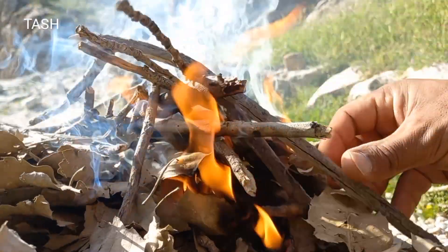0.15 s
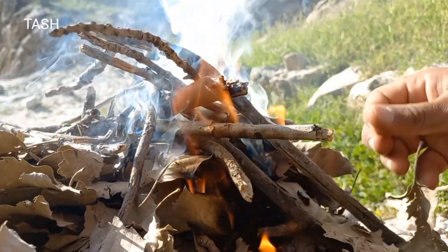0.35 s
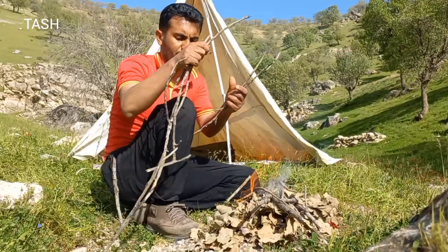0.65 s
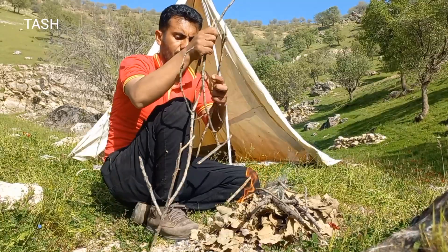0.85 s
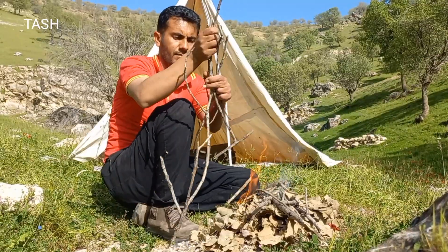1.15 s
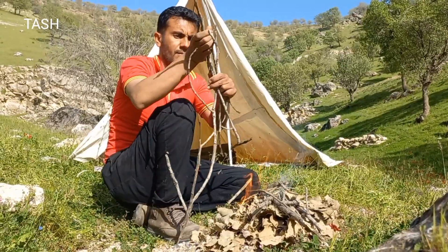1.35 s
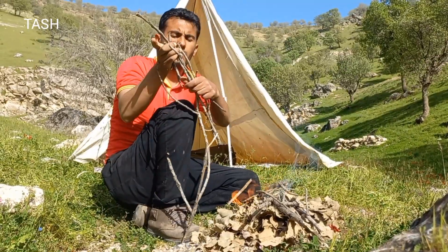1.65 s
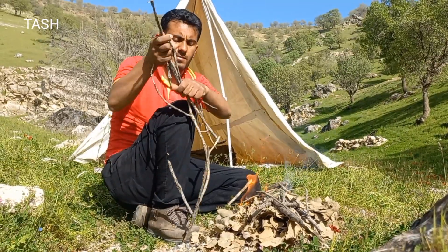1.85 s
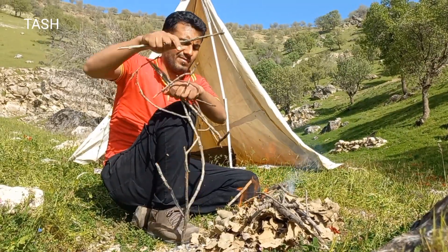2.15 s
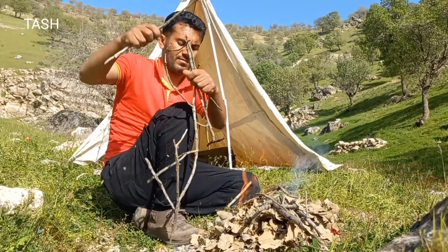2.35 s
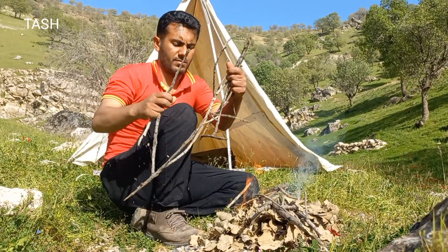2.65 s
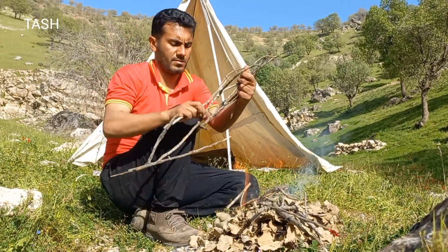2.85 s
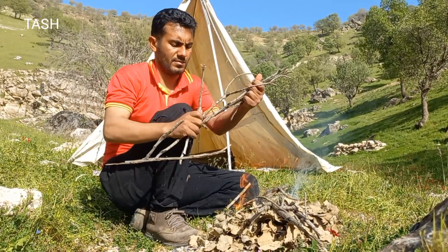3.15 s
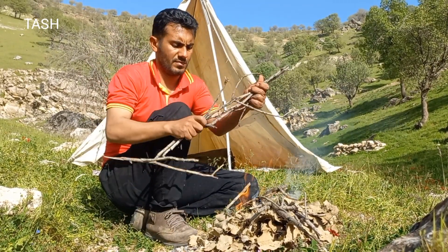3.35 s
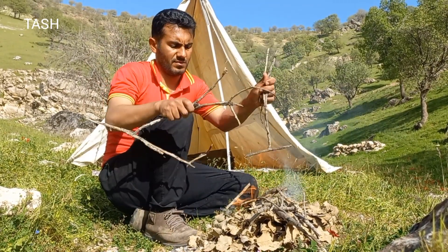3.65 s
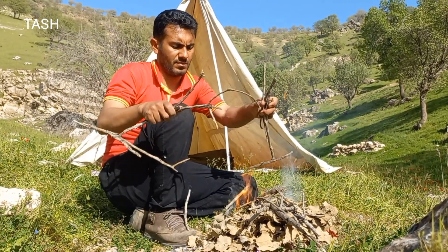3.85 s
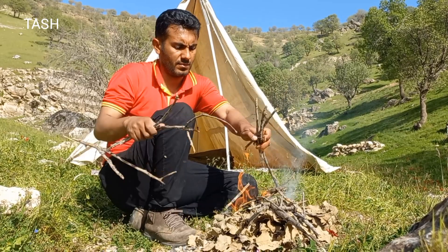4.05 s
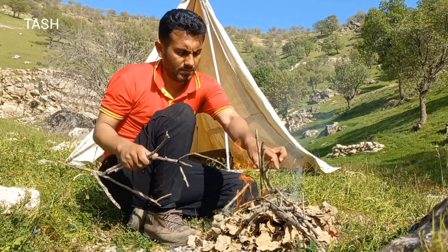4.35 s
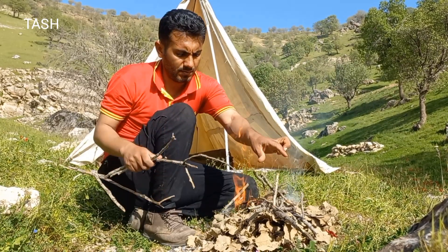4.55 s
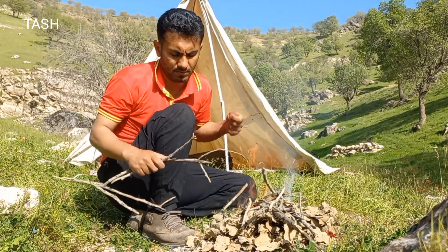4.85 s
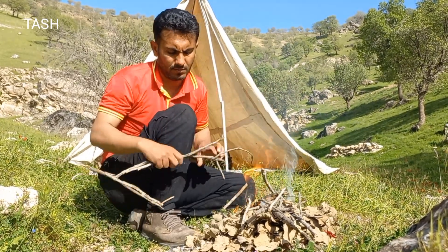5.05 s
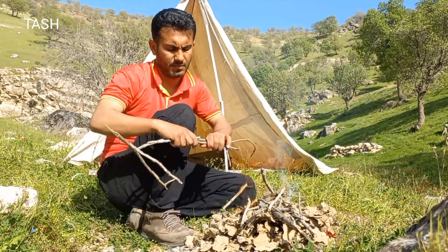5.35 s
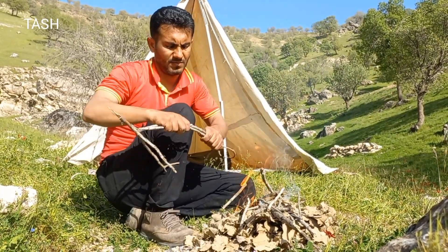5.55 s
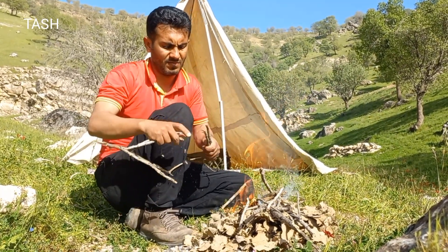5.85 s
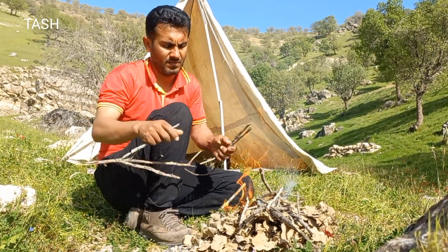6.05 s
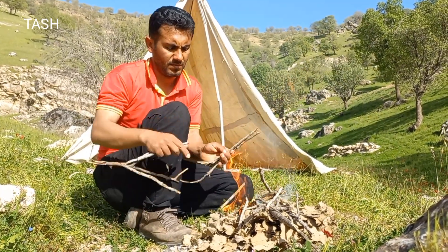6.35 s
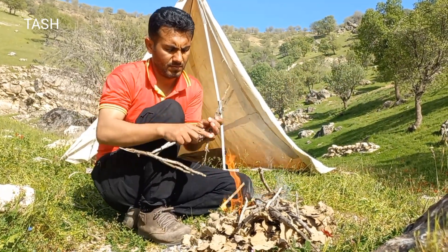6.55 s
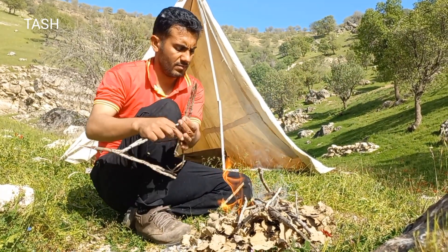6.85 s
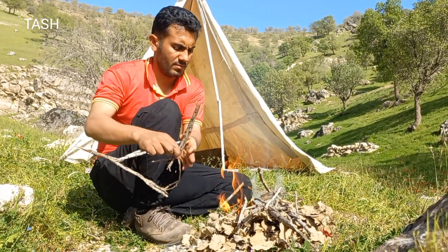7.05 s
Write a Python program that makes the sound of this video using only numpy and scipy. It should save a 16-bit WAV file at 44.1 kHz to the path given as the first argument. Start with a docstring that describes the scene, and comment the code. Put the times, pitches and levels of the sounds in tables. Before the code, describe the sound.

A stick is pushed into a small fire close by, with dry crackles, two tiny pops and a low flutter of flames. Then a thin branch is handled and broken, with sharp snaps near two and three seconds and fine rustling between. A soft dull knock follows, a distant bird whistles downward, one more snap comes, and the rubbing fades. Open hillside, close stereo microphone, soft hollow murmur behind.

```python
"""Dry twigs are snapped by hand beside a small fire on an open hillside.
First a stick is pushed into the fire close by, with two pops and a soft flutter of flames (shaped noise).
Then a branch is handled, bent and broken: short noise bursts ring in the wood, and tiny clicks make the rustle.
Midway a distant bird whistles (gliding sines), and once more near the end, while the rubbing grows quieter.
Throughout, the valley murmurs: soft noise with a faint hollow tone."""
import sys
import numpy as np
from scipy import signal
from scipy.io import wavfile

SR = 44100
rng = np.random.default_rng(int(sys.argv[2]) if len(sys.argv) > 2 else 0)


def dump_mix(stems):
    """Bounce the given channels to the path in sys.argv[1] as a 16-bit WAV at rate SR."""
    frames = np.atleast_2d(stems).T  # one column per channel
    limited = np.clip(frames, -1, 1)  # hard clip at full scale
    pcm = np.round(limited * 32767).astype(np.int16)
    wavfile.write(sys.argv[1], SR, pcm)


N = 317961
TIME = np.arange(N) / SR
LEAD_MS = 4   # each crack sound starts this long before the break itself
CRACK_MS = np.arange(SR // 12) * 1000 / SR - LEAD_MS   # clock of one crack, 0 at the break

# Body, crack and splinter ranges of dry wood. Each row: lowest and highest frequency in Hz.
WOOD_BANDS = [(1050, 2500), (2500, 7700), (8700, 16500)]


def from_db(db):
    """Decibels to gain."""
    return 10 ** (np.asarray(db) / 20)


def rms_one(x):
    """Scale to an rms (average strength) of 1."""
    return x / np.sqrt(np.mean(x ** 2) + 1e-20)


def in_time(rows):
    """Read each column of a curve at every sample; the first column is the time in seconds."""
    s, *columns = np.transpose(rows)
    return [np.interp(TIME, s, column) for column in columns]


def at_hz(points, hz):
    """Read a spectrum on a log-frequency axis."""
    point_hz, values = np.array(points)[:, 0], np.array(points)[:, 1]
    return np.interp(np.log(hz), np.log(point_hz), values)


def panned(pan_db):
    """Left and right gains that differ by pan_db (positive is left), scaled to an rms of 1."""
    return rms_one(from_db(np.array([[.5], [-.5]]) * pan_db))


def band(low, high, order=2):
    """Filter that passes low to high Hz."""
    return signal.butter(order, [low, min(high, .45 * SR)], "band", fs=SR, output="sos")


WOOD_FILTERS = [band(low, high, order=3) for low, high in WOOD_BANDS]


def highpass(x, hz):
    """Remove the sound below hz."""
    return signal.sosfilt(signal.butter(2, hz, "high", fs=SR, output="sos"), x)


def drift(rate_hz):
    """Slow random wandering around 0 with rms 1, made at a fortieth of the sample rate."""
    r = np.exp(-80 * np.pi * rate_hz / SR)
    noise = rng.standard_normal(N // 40 + 2002)
    slow = signal.lfilter([1], [1, -2 * r, r * r], noise)[2000:]   # drop the filter's start
    return np.interp(np.arange(N) / 40, np.arange(len(slow)), rms_one(slow))


def resonance(x, hz, width_hz):
    """Two-pole resonance with gain 1 on top."""
    return signal.lfilter(*signal.iirpeak(min(hz, .45 * SR), hz / width_hz, fs=SR), x)


def swell(start_s, length_s, attack_s, release_s):
    """Gain that rises, holds at 1 and dies away; attack and release are the times for 20 dB."""
    before = np.maximum(start_s - TIME, 0) / attack_s
    after = np.maximum(TIME - start_s - length_s, 0) / release_s
    return from_db(-20 * np.minimum(before + after, 5))


def add(out, s, sound):
    """Mix a sound in at time s."""
    i = max(0, round(s * SR))
    out[:, i:i + sound.shape[-1]] += sound[..., :N - i]


def fracture(levels_db, hold_ms, modes, spike_db, spike_ms, fall, lead_db):
    """Fibres start to tear, then give way in a spike; dense modes and the ground's scatter hold it a few ms."""
    after, broken = np.maximum(CRACK_MS, 0), CRACK_MS >= 0
    tearing = from_db(lead_db) * np.exp(np.minimum(CRACK_MS, 0) / 1.5)
    envelope = np.where(broken, 1 / (1 + (after / hold_ms) ** fall), tearing)
    out = 0
    for sos, db, sharp_db in zip(WOOD_FILTERS, levels_db, (-5, -4, 4)):   # the spike is sharpest in the treble
        spike = rng.standard_normal(len(after)) * broken * np.exp(-after / spike_ms)
        spike = spike * from_db(spike_db + sharp_db)
        burst = spike * panned(11) + rng.standard_normal((2, len(after))) * envelope
        ringing = sum(from_db(mode_db) * resonance(burst, hz, width_hz) for hz, width_hz, mode_db in modes)
        part = signal.sosfilt(sos, burst + ringing)
        # the level is that of the first 8 ms, on each side
        early_power = np.mean(part[:, broken & (after < 8)] ** 2, axis=1, keepdims=True)
        out = out + from_db(db) * part / np.sqrt(early_power)
    return out


def mode(hz, t60_s):
    """One struck mode of the wood; it reaches each microphone port within a cycle of the break."""
    t = np.maximum(CRACK_MS / 1000 - rng.random((2, 1)) / hz, 0)
    return np.sin(2 * np.pi * hz * t) * from_db(-60 * t / t60_s)


def snaps(piece_t60_s=0.035, thump_t60_s=0.05, ring_pan_db=-1.5, second_db=-7.5):
    """The branch breaks in stages; it and the freed piece ring, and the recoil in the hands adds a low thump."""
    # Each row: time in seconds, body, crack and splinter levels in dB, first and second pitch of the
    # broken piece in Hz, its ring in dB, ring of the branch in dB, thump in dB, hold time in ms,
    # left over right in dB.
    breaks = [(0.387, -66, -40.5, -46, 5600, 4550, -31.5, -75, -70, 9.2, -2),
              (1.726, -50, -42.5, -38.5, 3020, 3400, -36.5, -55, -56, 4.5, -3.5),
              (1.9469, -49.5, -41, -39.5, 2550, 2010, -32, -55.5, -47, 1.9, 2.5),
              (1.9498, -41, -34, -26, 2280, 7400, -36, -40.5, -59, 8.7, -2),
              (1.9849, -31, -24.5, -26.5, 2280, 1860, -30, -37, -69, 5.2, 0),
              (2.6873, -76, -41, -42, 3350, 5500, -53, -65, -52, 5.8, -4),
              (3.3247, -43, -34, -31.5, 1540, 2850, -33, -48, -41.5, 2.1, 0.5),
              (3.327, -39, -33, -20, 1567, 1940, -30.5, -39.5, -48, 5.8, -2),
              (3.372, -63, -35, -26, 6140, 4000, -32, -48, -51, 4.8, -2.5),
              (5.5164, -52, -45, -28.5, 12700, 1730, -29, -54, -47.5, 0.8, 7),
              (5.5172, -46, -37, -33.5, 1933, 1700, -37.5, -66, -52, 5, -4)]
    # Modes (ringing tones) of the dry branch. Each row: pitch in Hz, level in dB.
    branch = [(1040, -20), (1180, -12.5), (1640, 2), (1880, -7), (2270, -8), (2830, 0), (3070, -5),
              (3830, -10.5), (4230, 0), (4780, -5), (5130, -3.5), (6450, -9.5)]
    # Resonances of the splintering fibres. Each row: pitch in Hz, width in Hz, level in dB.
    fibres = [(6800, 850, -3.5), (7200, 150, 3), (11360, 350, 0.5), (12500, 310, -2.5)]
    branch_t60_s, mode_spread_db = 0.038, 2   # every break wakes each mode a little differently
    thump_low_hz, thump_high_hz = 260, 950
    out, after = np.zeros((2, N)), np.maximum(CRACK_MS, 0) / 1000
    mode_hz, mode_db = np.transpose(branch)
    for (s, body, crack, splinter, piece_hz, second_hz, piece_db, branch_db,
         thump_db, hold_ms, pan) in breaks:
        sound = fracture([body, crack, splinter], hold_ms, fibres,
                         spike_db=7, spike_ms=0.26, fall=2.6, lead_db=-15)
        spread_db = mode_spread_db * rng.standard_normal((2, len(mode_hz)))
        strengths = from_db(branch_db + mode_db + spread_db)
        ring = sum(gain[:, None] * mode(hz, branch_t60_s) for hz, gain in zip(mode_hz, strengths.T))
        piece = mode(piece_hz, piece_t60_s) + from_db(second_db) * mode(second_hz, piece_t60_s)
        ring = highpass(ring + from_db(piece_db) * piece, 600)   # the ring keeps no low end
        recoil = rng.standard_normal(len(after)) * (after > 0) * from_db(-60 * after / thump_t60_s)
        thump = signal.sosfilt(band(thump_low_hz, thump_high_hz, order=3), recoil)
        # make up for the strength lost in the narrow band
        thump = from_db(thump_db) * thump / np.sqrt(2 * (thump_high_hz - thump_low_hz) / SR)
        add(out, s - LEAD_MS / 1000, (sound + ring * panned(ring_pan_db) + thump) * panned(pan))
    return out


def ticks(rows, twig_db=-2.5, body_tilt=1.0, twig_width_hz=650):
    """Small fractures, each in a twig with its own pitch and hold time; bright ones trade body for splinter."""
    body_db, crack_db, splinter_db = -10.5, -0.5, 0.4   # the three ranges at brightness 0
    out = np.zeros((2, N))
    for s, db, bright_db, hz, pan in rows:
        hold_ms = 5 * from_db(rng.normal(0, 1.2))
        modes = [(hz, twig_width_hz, twig_db), (2.36 * hz, 700, twig_db)]
        levels_db = db + np.array([body_db - body_tilt * bright_db, crack_db, splinter_db + bright_db])
        sound = fracture(levels_db, hold_ms, modes, spike_db=2, spike_ms=.45, fall=2.3, lead_db=-12)
        add(out, s - LEAD_MS / 1000, sound * panned(pan))
    return out


def stray_ticks(rub_db):
    """Faint cracks at chance moments, their level tied to the rubbing up to a limit; rows as ticks() reads."""
    per_s, over_rub_db, spread_db, top_db = 7, 3, -1, -63.5   # top_db is the loudest allowed
    bright_mean_db, pan_db = -4, -7
    slots = np.arange(0, N, SR // 40)   # at most one crack in each slot
    chance, late, twig = rng.random((3, len(slots)))
    size, colour = rng.standard_normal((2, len(slots)))
    s = (slots + late * slots[1]) / SR
    db = np.minimum(rub_db[slots] + over_rub_db + spread_db * size, top_db)
    pan = np.full(len(slots), pan_db)
    rows = np.transpose([s, db, bright_mean_db + 3 * colour, 3500 + 4000 * twig, pan])
    return rows[(chance < per_s * slots[1] / SR) & (s < TIME[-1])]


def rubbing(resting_bright_db=-3):
    """Level and brightness of the rubbing: strokes add power to the handling, the strongest set the colour."""
    # The hands stay on the branch, busy at first and quieter once the piece is laid down.
    # Each row: time in seconds, level of the rubbing in dB.
    handling = [(0, -57), (.55, -83), (1.0, -67), (1.9, -70.5), (2.2, -71.5), (2.5, -69.5), (2.63, -76),
                (2.72, -73.5), (3.6, -64), (3.9, -78.5), (5.6, -81.5), (6.1, -87.5), (7.21, -85)]
    # Single scrapes of bark and leaves, and the creak before each break.
    # Each row: start in seconds, length in seconds, level in dB, brightness in dB.
    strokes = [(0.025, 0.012, -47, -2), (0.118, 0.07, -44.5, -5), (0.217, 0.042, -56.5, -3),
               (0.407, 0.034, -49.5, -2.5), (0.647, 0.077, -58, -4.5), (0.911, 0.01, -61.5, -7),
               (1.122, 0.13, -63, -3), (1.356, 0.081, -59.5, -1.5), (1.766, 0.12, -60, -1.5),
               (1.874, 0.15, -53.5, 1), (1.989, 0.052, -54.5, -12), (2.384, 0.042, -65, -10),
               (2.684, 0.017, -55.5, -7), (2.828, 0.088, -57.5, -4), (3.105, 0.039, -70.5, 10),
               (3.237, .02, -62, -2), (3.29, 0.036, -50, -4), (3.49, 0.062, -59, -12.5),
               (3.666, 0.027, -65, -8), (3.997, 0.035, -70.5, 0), (4.315, 0.081, -59.5, -8.5),
               (4.464, 0.041, -53, -5.5), (4.598, 0.016, -61, -7), (5.204, 0.25, -66, -4.5),
               (5.332, 0.021, -57, 2), (5.528, 0.07, -63, -4.5), (5.696, 0.041, -73, 1),
               (5.8, 0.026, -73, 7), (6.336, 0.11, -72.5, -4), (6.651, 0.082, -74, -1.5),
               (6.845, 0.1, -73.5, -1), (7.172, .045, -67.5, -17.5)]
    attack_s, release_s = 0.05, 0.089
    power = from_db(in_time(handling)[0]) ** 2
    colour = power * resting_bright_db
    for start_s, length_s, db, bright_db in strokes:
        stroke = (from_db(db) * swell(start_s, length_s, attack_s, release_s)) ** 2
        power = power + stroke
        colour = colour + stroke * bright_db
    return 10 * np.log10(power), colour / power


def rustle(level_db, bright_db, grains_per_s=700, size_db=2.5, twig_db=3, thick_db=-19,
           body_db=-10, crack_db=-2.0, splinter_db=3.0):
    """Rubbing bark and leaves shed a stream of tiny fractures of uneven size."""
    sizes = from_db(size_db * np.minimum(rng.exponential(1, N), 4)) * rng.choice([-1, 1], N)
    clicks = sizes * (rng.random(N) < grains_per_s / SR)
    ms = np.arange(SR // 60) * 1000 / SR
    dealt = rng.integers(0, 8, N)   # which twig each click belongs to
    grains = 0
    # several twigs, each with its own short ring
    for k, hz in enumerate([1450, 3100, 3900, 4600, 5400, 6800, 12000, 13500]):
        twig = rng.standard_normal((2, len(ms))) * np.exp(-ms / 4.0) * (1 - np.exp(-ms / .4))
        twig = twig + from_db(twig_db) * resonance(twig, hz, width_hz=hz / 8)
        grains = grains + signal.oaconvolve((clicks * (dealt == k))[None], twig, axes=1)[:, :N]
    out = 0
    for sos, db in zip(WOOD_FILTERS, [body_db - .5 * bright_db, crack_db, splinter_db + bright_db]):
        gain = from_db(level_db + db + 1.8 * drift(22))
        out = out + gain * rms_one(signal.sosfilt(sos, grains))
    thick = rms_one(signal.sosfilt(band(600, 1300), grains))
    out = out + from_db(level_db + thick_db - bright_db) * thick   # dull strokes wake the thick sticks
    return out * panned(np.where(TIME < .55, -3.5, -.8))   # the hand works further to the right at first


def knocks(contact_s=0.00013):
    """Soft contacts of sticks and hands wake one low mode each: a sine that dies away."""
    # Dull knocks. Each row: time in seconds, level in dB, pitch in Hz, time to fade by 60 dB in seconds.
    contacts = [(.169, -42.5, 690, 0.091), (0.316, -43, 201, 0.12), (0.438, -46, 91, 0.073),
                (1.045, -52, 225, 0.22), (1.726, -50.5, 210, 0.13), (2.687, -54, 225, .09),
                (3.372, -43, 513, 0.035), (3.476, -41, 546, 0.031), (3.527, -50, 96, .12),
                (3.68, -33.5, 650, 0.049), (3.687, -44.5, 294, 0.074), (4.463, -42.5, 840, 0.019),
                (4.51, -51.5, 264, 0.12)]
    out, t = np.zeros((2, N)), np.arange(SR // 4) / SR
    for s, db, hz, t60_s in contacts:
        fade = from_db(db - 60 * t / t60_s) * (1 - np.exp(-t / contact_s))
        add(out, s, np.sin(2 * np.pi * hz * t) * fade)
    return out * panned(-3.3)


def pops(hold_ms=0.6):
    """Gas pockets burst in the burning wood: one hard spike with almost no ring."""
    # Pops of the fire close by. Each row: time in seconds, body, crack and splinter levels in dB,
    # left over right in dB.
    bursts = [(.0095, -72, -54, -40, -8), (0.169, -43.5, -52, -59, 5)]
    out = np.zeros((2, N))
    for s, body, crack, splinter, pan in bursts:
        sound = fracture([body, crack, splinter], hold_ms, [],
                         spike_db=7, spike_ms=0.26, fall=2.6, lead_db=-30)
        add(out, s - LEAD_MS / 1000, sound * panned(pan))
    return out


def banded_noise(spectrum, patchy_db):
    """Half-octave bands of stereo noise, each flickering on its own, the treble least; rms 1."""
    # How alike left and right are. Each row: frequency in Hz, likeness from -1 (opposite) to 1 (same).
    likeness = [(40, -0.78), (120, 1), (300, 0.76), (640, 0.18), (1410, -0.3), (3100, -0.07),
                (15000, -0.68)]
    steady_above_hz = 330   # higher bands flicker less
    out, edges = 0, 28 * 2 ** np.arange(0, 9.6, .5)
    white = rng.standard_normal((2, 2, N))
    for k, (low, high) in enumerate(zip(edges, edges[1:])):
        mid, side = signal.sosfilt(band(low, high, order=3), white[k % 2])
        hz = np.sqrt(low * high)
        alike = np.clip(at_hz(likeness, hz), -1, 1)
        flicker_db = patchy_db * min(1, np.sqrt(steady_above_hz / hz)) * drift(12.4)
        stereo = np.sqrt(1 + alike) * mid + np.sqrt(1 - alike) * side * [[1], [-1]]
        out = out + from_db(at_hz(spectrum, hz) + flicker_db) * stereo
    return rms_one(out)


def flames():
    """Low flutter of the stirred fire: noise that swells with each stir."""
    # Colour of the flutter. Each row: frequency in Hz, relative level of the noise band there in dB.
    flame_colour = [(30, -19), (60, -4), (100, 3.5), (210, 3.5), (350, -1), (700, 1.5), (1200, -9.5),
                    (2500, -20), (5000, -32)]
    # The burning heap is pushed and the flames flutter; the last row is the piece being laid down. # Each row:
    # start in seconds, length in seconds, level in dB.
    stirs = [(0, 0.45, -56), (0.142, 0.027, -49), (4.455, 0.063, -60)]
    attack_s, release_s = 0.081, 0.18
    power = sum((from_db(db) * swell(s, length_s, attack_s, release_s)) ** 2 for s, length_s, db in stirs)
    return np.sqrt(power) * banded_noise(flame_colour, patchy_db=1.5) * panned(-0.46)


def whistle(glide, db, waver):
    """A near-pure note that fades in, follows its (s, Hz) glide with an unsteady pitch and fades out."""
    attack_s, release_s = 0.029, 0.039
    hz = in_time(glide)[0] * (1 + waver * drift(110))
    start_s, end_s = glide[0][0], glide[-1][0]
    gain = from_db(db) * swell(start_s, end_s - start_s, attack_s, release_s)
    return np.sqrt(2) * gain * np.sin(2 * np.pi * np.cumsum(hz) / SR)


def bird():
    """A long falling whistle and a few short notes, blurred by scatter from rocks and trees on the slope."""
    # The long falling whistle. Each row: time in seconds, pitch in Hz, level in dB.
    falling = [(3.978, 3130, -70), (4.007, 2804, -71), (4.06, 2640, -68.5), (4.104, 2350, -70),
               (4.125, 2030, -73), (4.15, 1820, -65), (4.2, 1650, -69.5), (4.235, 1545, -67)]
    # Short notes. Each row: start in seconds, length in seconds, first, middle and last pitch in Hz,
    # level in dB, pitch waver as a share of the pitch.
    notes = [(3.812, 0.022, 3160, 3240, 3230, -70.5, 0.02), (4.299, 0.0043, 1498, 1530, 1590, -60, 0.054),
             (4.965, 0.21, 2700, 2720, 2950, -75.5, .035), (5.185, 0.027, 3613, 3630, 3520, -78, 0.033),
             (7.15, 0.058, 2696, 2910, 2890, -66, 0.0103), (7.157, .01, 4260, 4280, 4250, -77, 0.021)]
    falling_waver, flutter_db, echo_db, slope_t60_s = 0.013, 2.5, -3, 0.3   # waver as a share of the pitch
    song = whistle([row[:2] for row in falling], in_time(falling)[1], falling_waver)
    for s, length_s, first_hz, middle_hz, last_hz, db, waver in notes:
        glide = [(s, first_hz), (s + length_s / 2, middle_hz), (s + length_s, last_hz)]
        song += whistle(glide, db, waver)
    song *= rms_one(from_db(flutter_db * drift(30)))   # the level flutters
    t = TIME[:SR // 3]
    slope = rng.standard_normal((2, len(t))) * from_db(-60 * t / slope_t60_s)
    echo = signal.oaconvolve(song[None], rms_one(slope) / np.sqrt(len(t)), axes=1)[:, :N]
    return song + from_db(echo_db) * echo


def valley_air(waver=0.0233):
    """A soft low murmur with a narrow hollow tone that wanders in pitch, comes and goes, and at times stands out."""
    # Colour of the open air. Each row: frequency in Hz, relative level of the noise band there in dB.
    air_colour = [(18, -61), (30, -52.5), (79, -1), (145, -9), (165, -7.5), (210, -7.5), (295, -4),
                  (336, -2.5), (512, -5.5), (649, -8), (1910, -17), (2170, -18.5), (2680, -26.5),
                  (3490, -29.5), (16000, -35)]
    # The murmur slowly eases. Each row: time in seconds, level in dB.
    air_db = [(0, -57.5), (1, -58), (3.5, -57.5), (4.5, -58.5), (7.21, -59.5)]
    # The clearest swells of the hollow tone.
    # Each row: start in seconds, length in seconds, pitch in Hz, level in dB.
    hollow_swells = [(1.323, 0.054, 490, -58.5), (3.592, 0.074, 520, -59), (5.186, 0.0052, 505, -56.5),
                     (5.704, 0.042, 490, -60), (6.525, 0.029, 493, -60.5)]
    hollow_db, hollow_hz, width_hz = -66.5, 509, 85   # a faint tone in the distance
    swing_db, swing_rate_hz, wander_hz = 2.5, 4.3, 22.04
    air = from_db(in_time(air_db)[0]) * banded_noise(air_colour, patchy_db=2.5)
    phase = 2 * np.pi * np.cumsum(hollow_hz + wander_hz * drift(swing_rate_hz)) / SR
    # two slow random waves widen the tone into a narrow band
    hollow = rms_one(drift(width_hz / 2) * np.cos(phase) + drift(width_hz / 2) * np.sin(phase))
    hollow = from_db(hollow_db + swing_db * drift(swing_rate_hz)) * hollow
    clear = sum(whistle([(s, hz), (s + length_s, hz)], db, waver) for s, length_s, hz, db in hollow_swells)
    return (air + hollow + clear) * panned(-4.0)


def scene():
    """Wood in front, fire and hillside behind."""
    # The clearest small cracks of bark, twig tips and dry leaves. Each row: time in seconds, level in dB,
    # brightness in dB (thin twigs high, thick ones low), pitch of the twig in Hz, left over right in dB.
    clear_ticks = [(0.0755, -64, 15, 6400, 0), (0.1084, -43.5, -1, 5300, 10), (0.126, -52.5, 15, 5400, -16),
                   (0.1586, -46.5, -6, 4600, 1), (0.17, -52, -13, 2900, 16), (0.195, -54, -10, 4000, 3),
                   (0.211, -47, 2, 4550, 6), (.3312, -54, -1, 5430, 4), (0.34, -53.5, 5, 5100, -18),
                   (0.356, -59, 2, 7000, -1), (.375, -50, -2, 4530, 0), (.386, -45.5, -1, 5600, -5),
                   (0.417, -47, -5, 7700, 7), (0.427, -46, 4, 6950, -4), (0.461, -52.5, -7, 4600, 4),
                   (.484, -53, -6, 6800, 10), (.497, -53.5, 11.5, 5630, -7), (0.694, -55.5, 5, 6100, -3),
                   (0.731, -59.5, 9, 7200, -2), (.8058, -52.5, 4.5, 3930, -4), (.882, -51, 2, 3800, -1),
                   (.928, -49, 5.5, 5050, -3), (0.937, -50.5, 3, 5040, -1), (1.0, -59.5, 4.5, 3700, 0),
                   (1.018, -65, 3, 4200, -4), (1.028, -59, 6, 6200, 1), (1.113, -59, 8.5, 5100, -1),
                   (1.131, -50.5, -2, 4700, -2), (1.3109, -53, 1, 3800, -1), (1.359, -53, 9.5, 6800, -1),
                   (1.497, -59, 4.5, 3820, -2), (1.611, -50, 0, 6800, -2), (1.663, -63, 16.5, 9000, -8),
                   (1.782, -57, 10, 6000, -5), (1.842, -47, 5, 6600, 1), (1.9125, -54, 2, 6000, 2),
                   (1.93, -44, 0, 4900, -3), (1.971, -46.5, 3, 7000, 7), (2.0182, -50, 5, 5100, -1),
                   (2.038, -52, 4, 5700, 2), (2.0774, -59, 11, 7500, -1), (2.243, -54, 4, 3860, -1),
                   (2.28, -58.5, 5, 7060, -2), (2.351, -56, 3, 6100, -6), (2.386, -49.5, 3, 4100, 0),
                   (2.449, -61.5, 4, 9300, -3), (2.477, -62, 5, 6800, -1), (2.524, -56.5, 2, 6400, -2),
                   (2.658, -57.5, 3, 6400, -1), (2.7613, -54, 5, 5440, -2), (2.852, -53.5, -5, 5100, -3),
                   (2.959, -62.5, 5, 7300, -3), (3.07, -64.5, 15.5, 5200, -3), (3.157, -54, 5.5, 5330, -2),
                   (3.178, -61.5, 1, 5300, -4), (3.24, -49, 1, 4530, -4), (3.365, -49, -8, 6100, 1),
                   (3.437, -59, -4, 4900, 0), (3.4814, -47.5, -3, 3240, -1), (3.491, -49, -6, 6600, -3),
                   (3.526, -60, -10, 3220, -4), (3.542, -56, -2, 4340, -3), (3.666, -59.5, 4, 4000, 0),
                   (3.68, -54.5, -12.5, 6300, -3), (3.7665, -61.5, -8, 4900, -4),
                   (4.3847, -53.5, -1, 3870, -1), (4.435, -49, -0.5, 5470, -1), (4.462, -53, -8, 4940, -6),
                   (4.466, -51, -2, 4970, 11), (4.475, -54, -4, 3100, 0), (4.517, -65, -4, 5400, -3),
                   (4.8398, -58.5, -8, 3360, -8), (5.241, -61, 5, 7400, -1), (5.389, -63, 12, 6060, -3),
                   (5.529, -47, -1, 7000, 7), (5.5455, -48.5, 6.5, 4900, -1), (5.591, -67, 14.5, 6600, 0),
                   (5.6045, -67, 10, 6000, 0), (5.823, -66.5, 5, 6900, -2), (5.84, -69, 7, 5400, 0),
                   (5.89, -67.5, -2, 5000, -2), (6.159, -67.5, -3.5, 6900, -3.5),
                   (6.66, -64.5, -1.5, 6400, -4), (6.705, -58, 3, 7300, -5), (6.808, -69, 1, 5040, -7),
                   (6.838, -64, 6, 4900, -4), (6.925, -69.5, -2, 4900, -10.5), (6.988, -67.5, 3, 7350, -4),
                   (7.176, -62, -1, 4900, -5)]
    rub_db, bright_db = rubbing()
    wood = snaps() + ticks(clear_ticks) + ticks(stray_ticks(rub_db)) + rustle(rub_db, bright_db) + knocks()
    behind = pops() + flames() + bird() + valley_air()
    return wood + behind


def record(dry):
    """Each microphone port colours the sound in its own way; the deep bass and the top are cut."""
    # Colour of the two ports. Each row: frequency in Hz, width in Hz, boost or cut in dB.
    left_port = [(1280, 270, -6.5), (4970, 1800, -3), (8360, 1700, -8), (12600, 1200, 1)]
    right_port = [(5100, 1100, 4), (9000, 3900, -4), (14330, 7750, -5.5)]
    cutoff_hz = 15900
    sides = []
    for x, port in zip(dry, (left_port, right_port)):
        for hz, width_hz, db in port:
            x = x + (from_db(db) - 1) * resonance(x, hz, width_hz)
        sides.append(highpass(x, 42))
    return signal.sosfilt(signal.ellip(10, .3, 70, cutoff_hz, fs=SR, output="sos"), sides)


dry = scene()
out = record(dry)
dump_mix(out)
```